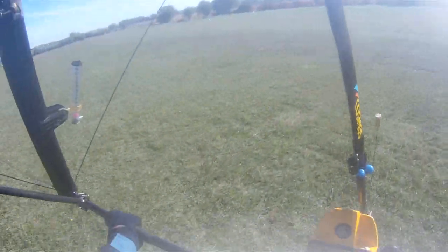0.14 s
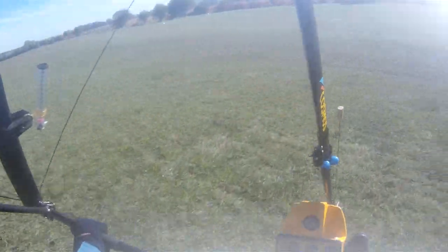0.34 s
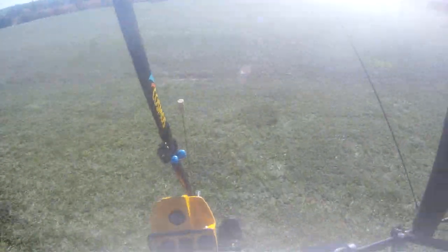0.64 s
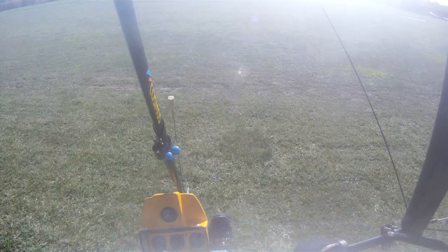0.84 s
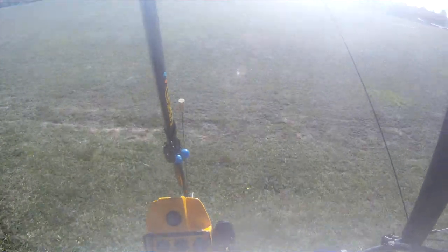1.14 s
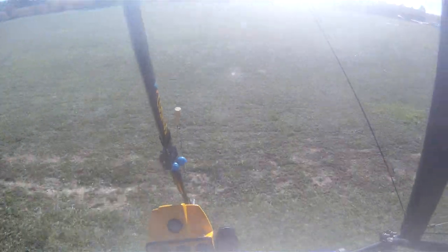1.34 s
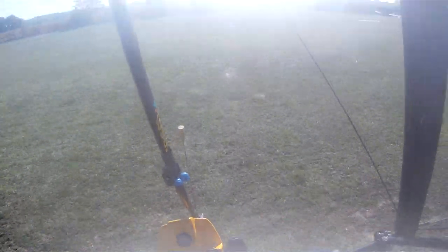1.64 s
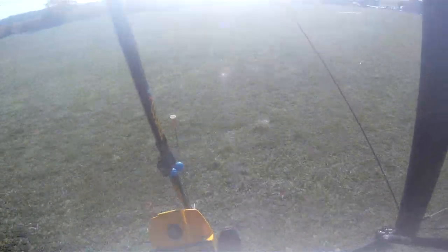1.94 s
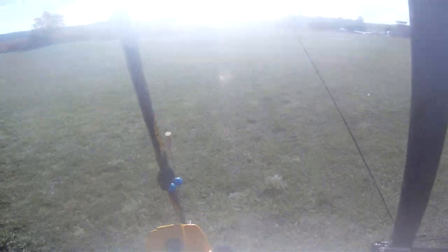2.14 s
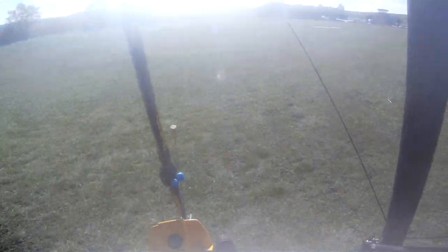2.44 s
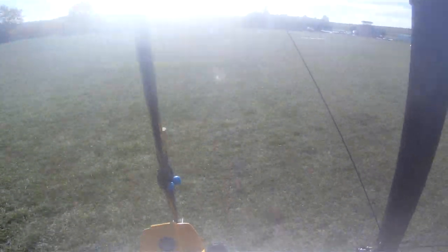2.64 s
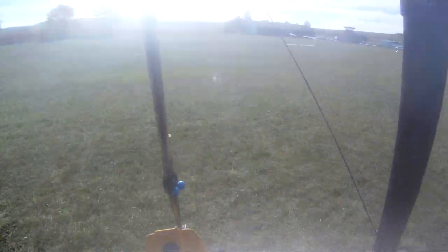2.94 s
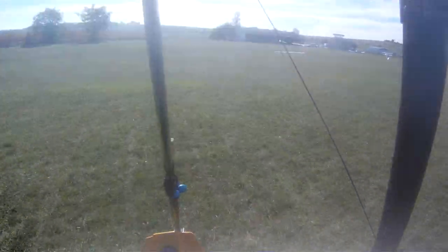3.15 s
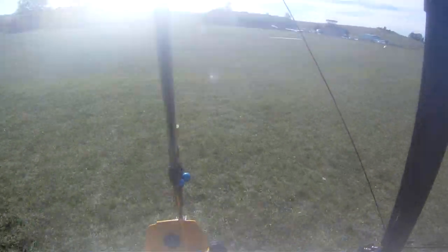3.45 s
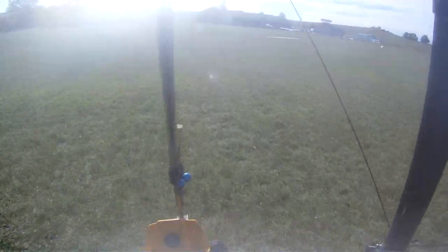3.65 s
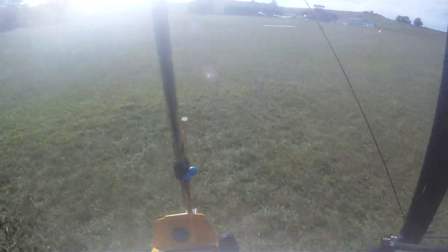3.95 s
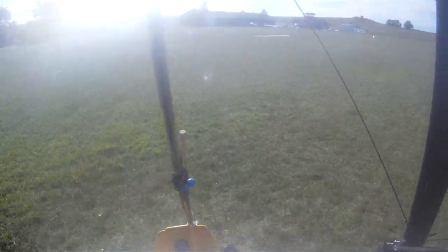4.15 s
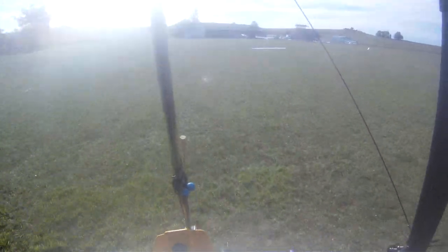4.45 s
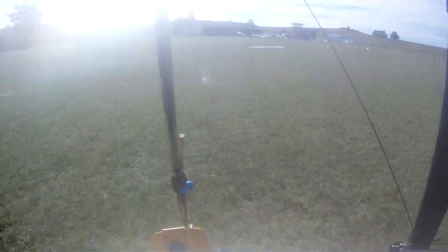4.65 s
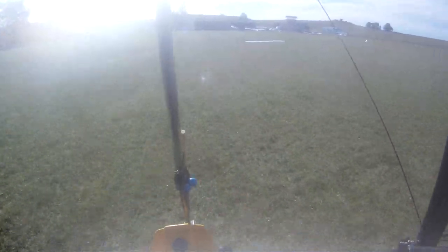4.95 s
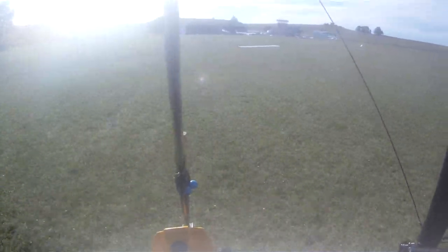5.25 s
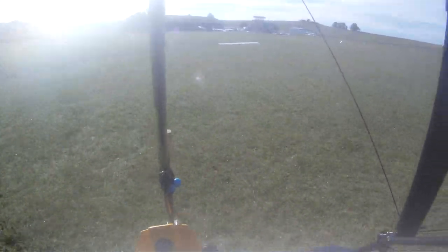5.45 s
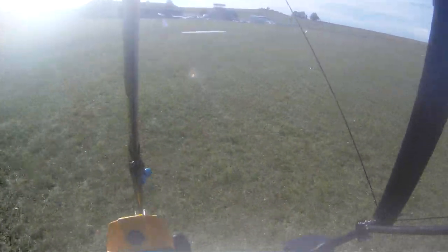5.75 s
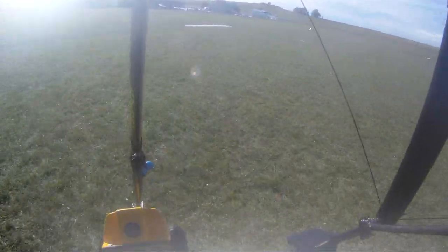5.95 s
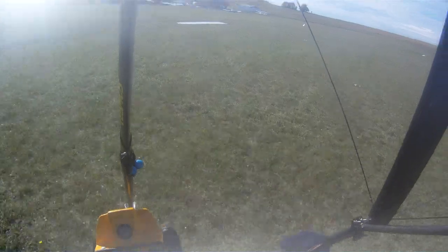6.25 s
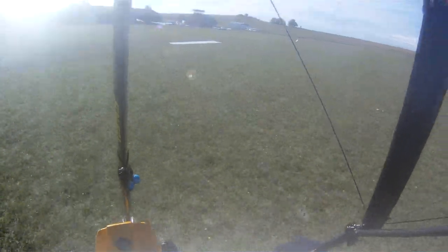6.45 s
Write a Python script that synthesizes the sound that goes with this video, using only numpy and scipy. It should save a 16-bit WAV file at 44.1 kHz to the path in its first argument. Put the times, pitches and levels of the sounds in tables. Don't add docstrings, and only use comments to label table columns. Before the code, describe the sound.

Small aircraft engine hums low under a ringing, fluttering rush of air and hard clattering, with bumps from the grass, easing near the end.

```python
import sys
import numpy as np
from scipy import signal
from scipy.fft import rfft, irfft
from scipy.io import wavfile
from scipy.ndimage import uniform_filter1d

SR = 44100
rng = np.random.default_rng(int(sys.argv[2]) if len(sys.argv) > 2 else 0)


def how_loud(loudness_db):
    steps = np.asarray(loudness_db, float) / 20
    return 10 ** steps


def file_out(sig):
    cols = np.atleast_2d(sig).T
    lim = np.clip(cols, -1, 1)
    pcm = np.round(lim * 32767).astype(np.int16)
    wavfile.write(sys.argv[1], SR, pcm)


N = 291060
T = np.arange(N) / SR


def curves(table):
    s, *columns = np.transpose(table)
    return [np.interp(T, s, column) for column in columns]


def unit(x):
    return x / np.sqrt(np.mean(x ** 2))


def noise():
    return rng.standard_normal(N)


def ramp(start_s, end_s):
    return np.clip((T - start_s) / (end_s - start_s), 0, 1)


def bump(center_s, width_s):
    return np.exp(-0.5 * ((T - center_s) / width_s) ** 2)


def walk(rate_hz):
    k = int(SR / rate_hz)
    steps = np.repeat(rng.standard_normal(N // k + 1), k)
    return unit(uniform_filter1d(uniform_filter1d(steps, k), k)[:N])


def ring(x, modes):
    f = np.fft.rfftfreq(N, 1 / SR) + 1e-3
    power = sum(how_loud(2 * db) / (1 + ((f - hz ** 2 / f) / width) ** 2) ** 2 for hz, width, db in modes)
    cepstrum = irfft(0.5 * np.log(power + 1e-12), N)
    cepstrum[1:N // 2] *= 2
    cepstrum[N // 2 + 1:] = 0
    return unit(irfft(rfft(x) * np.exp(rfft(cepstrum)), N))


def even(x, firm):
    return unit(x / (np.abs(signal.hilbert(x)) + 0.6) ** firm)


# start_s, level_db
AIRFLOW = [(0.0, -37.5), (0.13, -36), (0.15, -38), (0.6, -34.5), (1.36, -33.5), (1.51, -31), (3.79, -30.5),
           (3.88, -33.5), (5.0, -35), (6.38, -41.5), (6.6, -39)]


def airflow_level(full_db, share, before_turn_db, gust_db):
    flow_change_db = curves(AIRFLOW)[0] + 31
    head_aside = 1 - ramp(0.6, 1.47)
    return full_db + share * flow_change_db + before_turn_db * head_aside + gust_db * walk(8)


CLIP_MODES = [(5540, 130, 0.5), (3810, 80, -3)]
CLIP_TOUCHES = [(0.1241, -57), (0.1575, -45), (0.2154, -43), (0.2623, -45), (0.2877, -50), (0.3875, -52),
                (0.4075, -50), (0.4768, -52), (0.6015, -51), (0.7013, -49)]


def clip_buzz(turns):
    touches = sum(how_loud(db - 2.5) * bump(s + 0.005, 0.005) for s, db in CLIP_TOUCHES)
    crank = turns / 2
    light_db = -50 + 2 * rng.standard_normal(N // 100)[crank.astype(int)]
    light = how_loud(light_db) * np.exp(-0.5 * ((crank % 1 - 0.65) / 0.079) ** 2)
    settled_s = 0.75
    shiver = (how_loud(-57) + light) * (1 - ramp(settled_s - 0.3, settled_s + 0.15))
    tone = sum(how_loud(db) * even(ring(noise(), [(hz, width, 0)]), firm=0.7) for hz, width, db in CLIP_MODES)
    return (touches + shiver) * tone


# start_s, strut_db, sway_db, ring_s
JOLTS = [(0.399, -45, -53, 0.11), (0.715, -37.5, -59, 0.048), (0.959, -47, -46.5, 0.2),
         (1.279, -47, -50, 0.1), (1.503, -44, -41, 0.1), (1.713, -40.5, -58, 0.13),
         (2.177, -36, -45, 0.088), (2.419, -39, -51, 0.1), (2.629, -43, -49, 0.1), (2.899, -45, -54, 0.1),
         (3.11, -43, -42.5, 0.065), (3.26, -43.5, -61, 0.079), (3.456, -42.5, -62, 0.092),
         (3.77, -46, -49, 0.11), (4.099, -42, -49, 0.068), (4.303, -43.5, -46, 0.12),
         (4.759, -46.5, -51, 0.1), (4.993, -51, -44, 0.14), (5.553, -43.5, -50, 0.074),
         (5.758, -33, -47, 0.1), (6.369, -44.5, -46, 0.12)]


def jolts(rest_db, axis):
    rise_s = 0.03
    power = how_loud(2 * rest_db)
    for row in JOLTS:
        s, ring_s = row[0], row[3]
        fade = np.exp(-np.clip(T - s - rise_s, 0, 9) / ring_s)
        power = power + how_loud(2 * row[axis]) * ramp(s - rise_s, s + rise_s) * fade
    return np.sqrt(power)


# pitch_hz, width_hz, level_db
FRAME_MODES = [
    [(21.5, 9.5, 0)],
    [(59.6, 12.4, 0)],
    [(126, 203, 1), (162, 39, -5), (252.4, 53, 7.5), (331, 160, -5.5)],
]


def frame_shake():
    sway_modes, strut_modes, seat_modes = FRAME_MODES
    sway = jolts(-57.5, axis=2) * how_loud(3) * even(ring(noise(), sway_modes), firm=0.6)
    struts = jolts(-50.5, axis=1) * how_loud(-3) * even(ring(noise(), strut_modes), firm=0.9)
    seat_db = airflow_level(-43, share=0.7, before_turn_db=1.5, gust_db=2)
    seat = how_loud(seat_db - 2.5) * even(ring(noise(), seat_modes), firm=0.5)
    return sway + struts + seat


# start_s, peak_db, push_ms, strut_ring_db, seat_ring_db
THUDS = [
    (0.527, -30, 2.8, -17, -6),
    (0.729, -34, 4, -9, -16),
    (2.182, -35, 4, -14, -11),
    (2.564, -36, 5, -16, -10),
    (2.645, -33, 3.5, -17, -9),
    (3.049, -36, 6, -16, -6),
    (5.5585, -27, 2.8, -18, -9),
    (5.760, -35, 6, -9, -14),
]


def thuds():
    out = 0
    for s, db, push_ms, strut_db, seat_db in THUDS:
        age = np.clip(T - s, 0, 0.3)
        sounding = age < 0.3
        push = how_loud(db) * bump(s + 0.004, push_ms / 3000)
        strut = how_loud(db + strut_db + 8) * np.exp(-age / 0.022) * np.sin(2 * np.pi * 63 * age)
        seat = how_loud(db + seat_db + 7) * np.exp(-age / 0.013) * np.sin(2 * np.pi * 190 * age)
        out = out - push - (strut + seat) * sounding
    return out


# start_s, firing_rate_hz
ENGINE_SPEED = [(0.0, 78.4), (0.35, 82.82), (0.7, 84.02), (1.15, 83.58), (1.45, 86.29), (1.75, 88.79),
                (2.2, 89.7), (2.75, 94.25), (3.1, 94.13), (3.45, 95.02), (3.72, 95.73), (3.95, 89.91),
                (4.25, 85.78), (4.6, 83.13), (5.2, 82.44), (5.7, 78.49), (6.1, 79.79), (6.6, 77.69)]


def engine():
    hz = curves(ENGINE_SPEED)[0]
    return np.cumsum(hz) / SR, hz


# firing_rate_multiple, level_db, best_firing_rate_hz, fall_db_per_hz, throttle_shut_change_db
MAIN_ORDERS = [(3, -39.5, 88.1, 0.7, -0.5), (2, -49, 86.2, 0.33, 3.5), (4, -55.5, 89, 0, -3),
               (5, -56, 94, 0.5, -3)]
# firing_rate_multiple, level_db
WEAK_ORDERS = [(0.251, -51.5), (.75, -63.5), (1, -54), (1.75, -59), (2.251, -60), (2.5, -70), (3.25, -55),
               (4.5, -73), (6, -70), (7, -66)]


def exhaust_hum(turns, hz):
    shut = ramp(3.83, 3.83 + 0.29)
    orders = list(WEAK_ORDERS)
    for multiple, db, best_hz, fall_db, shut_db in MAIN_ORDERS:
        orders.append((multiple, db - fall_db * abs(hz - best_hz) + shut_db * shut))
    out = 0
    for multiple, db in orders:
        phase = 2 * np.pi * round(4 * multiple) / 4 * turns + 0.19 * walk(12) + 6 * rng.random()
        out = out + how_loud(db + 0.65 * walk(13)) * np.sqrt(2) * np.sin(phase)
    return out


def clatter(turns, cylinder_db, at, width, scatter_db, steady, blow=0, back=1):
    stroke = turns.astype(int)
    scatter = scatter_db * rng.standard_normal(stroke[-1] + 1)[stroke]
    size = how_loud(np.choose(stroke % len(cylinder_db), cylinder_db) + scatter)
    rasp = size * np.exp(-0.5 * ((turns % 1 - at) / width) ** 2)
    strike = np.diff(np.floor(turns - at), prepend=np.floor(-at))
    direction = np.where(stroke % 2, back, 1)
    return noise() * np.sqrt(steady + rasp ** 2) + blow * size * strike * direction


# pitch_hz, width_hz, level_db
FIN_MODES = [(5383, 650, 0)]


def valve_ticks(turns):
    level_db = airflow_level(-51.5, share=0.6, before_turn_db=-2.5, gust_db=0.26)
    ticks = clatter(turns / 2, [1, 1], at=0.5, width=0.15, scatter_db=2, steady=0.7)
    return how_loud(level_db + 3.6) * ring(ticks, FIN_MODES)


# pitch_hz, width_hz, level_db
PORT_MODES = [(1217.4, 91, 0)]


def microphone_port(turns):
    level_db = airflow_level(-43.5, share=0.35, before_turn_db=-6.5, gust_db=0.5)
    puffs = clatter(turns / 2, [-2, 1], at=0.13, width=0.09, scatter_db=2, steady=1.1)
    return how_loud(level_db + 0.9) * ring(puffs, PORT_MODES)


# start_s, length_s, case_db, shell_db
SPELLS = [
    [(0, .8, 5, 4), (.6, 1.7, 2, 7), (1.3, .7, 5, 1), (3.05, .2, 1, 5), (5.4, 1.2, 7, 2)],
    [(0, .6, 4, 8), (2.6, 2.2, 2, 4), (3.05, .2, 0, 3)],
    [(0, 1.3, 7, 5.5), (3.05, .3, 2, 9), (3.75, .3, 3, 9), (4.25, 1.1, 9, 7)],
    [(0, 1.5, 1, 4), (.8, 1.5, 7, 3), (2.6, .4, 3, 4), (3.75, .2, 1, 6)],
]


def knocks(axis):
    calm_db, ramp_s = -7, 0.12
    levels = []
    for rows in SPELLS:
        level_db = calm_db
        for row in rows:
            s, end_s = row[0], row[0] + row[1]
            level_db = level_db + row[axis] * ramp(s - ramp_s, s) * (1 - ramp(end_s, end_s + ramp_s))
        levels.append(level_db)
    return np.array(levels)


# pitch_hz, width_hz, level_db
SHELL_MODES = [(552, 115, -1), (773, 133, -1), (1001, 130, 0), (765, 660, -4.5)]


def helmet_shell(turns):
    level_db = airflow_level(-44, share=0.88, before_turn_db=-3, gust_db=0.47)
    blows = clatter(turns, 1.6 * knocks(axis=3) + 1, at=0.22, width=0.17, scatter_db=1.3,
                    steady=0.37, blow=14, back=-0.5)
    return how_loud(level_db + 0.87) * ring(blows, SHELL_MODES)


# start_s, peak_db
HARD_KNOCKS = [(0.1023, -13), (0.3123, -37), (0.4196, -14.5), (0.61, -12.5), (0.6814, -14.5), (0.823, -15),
               (1.008, -13), (1.1615, -20), (1.3275, -22), (1.5715, -12), (1.6183, -12.5), (1.6646, -11),
               (1.791, -22), (2.714, -14.5), (2.963, -15), (3.0296, -26), (3.186, -27), (3.476, -26),
               (3.572, -22), (3.6725, -23), (4.167, -19), (4.4037, -21), (4.45, -22), (4.64, -26),
               (4.8823, -30), (4.9803, -16), (5.075, -24), (5.242, -25), (5.342, -23), (5.897, -24)]


def hard_knocks():
    case = 0
    jab = 0
    for s, db in HARD_KNOCKS:
        case = case + how_loud(db - 5) * bump(s + 0.003, 0.0022)
        jab = jab + how_loud(db - 23.5) * bump(s + 0.003, 0.0017) * np.cos(2 * np.pi * 800 * (T - s))
    return case * np.sin(2 * np.pi * 2330 * T) + jab


# pitch_hz, width_hz, level_db
CAVITY_MODES = [(2003, 166, -9), (2111, 186, -1), (2292, 110, 1.5), (2415, 142, 0.5), (2668, 250, -12.5)]
# pitch_hz, width_hz, level_db
WALL_MODES = [(1470, 167, 1.5), (1736, 240, -1), (3127, 434, -3.5), (3735, 610, -9), (4195, 850, -12.5)]


def camera_case(turns):
    knock_db = knocks(axis=2)
    blows = clatter(turns, knock_db + 1, at=0.17, width=0.24, scatter_db=0.7, steady=0.38, blow=5)
    cavity = ring(blows * how_loud(0.6 * walk(40)), CAVITY_MODES)
    rush = clatter(turns, knock_db - 3, at=0.25, width=0.2, scatter_db=2, steady=0.8)
    walls = ring(rush, WALL_MODES)
    return how_loud(curves(AIRFLOW)[0] + 1.5) * (cavity + how_loud(-10.5) * walls)


def scene():
    turns, hz = engine()
    background = clip_buzz(turns) + frame_shake() + thuds()
    motor = exhaust_hum(turns, hz) + valve_ticks(turns)
    helmet = microphone_port(turns) + helmet_shell(turns)
    case = hard_knocks() + camera_case(turns)
    return (background + motor + helmet + case)[None]


def low_pass(x):
    return signal.sosfilt(signal.butter(12, 16410, fs=SR, output="sos"), x)


def record(dry):
    rounded = np.tanh(5.5 * dry) / 5.5
    slow = signal.resample_poly(rounded, 40, 147, axis=1)
    held = np.repeat(slow, 4, axis=1)
    mirrored = signal.resample_poly(held, 147, 160, axis=1)[:, :N]
    top_cut = signal.ellip(12, 0.3, 60, 15270, fs=SR, output="sos")
    return low_pass(signal.sosfilt(top_cut, mirrored))


dry = scene()
out = record(dry)
file_out(out)
```